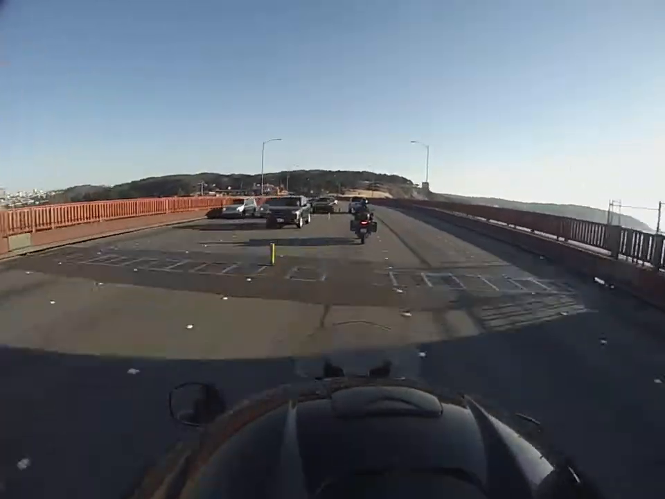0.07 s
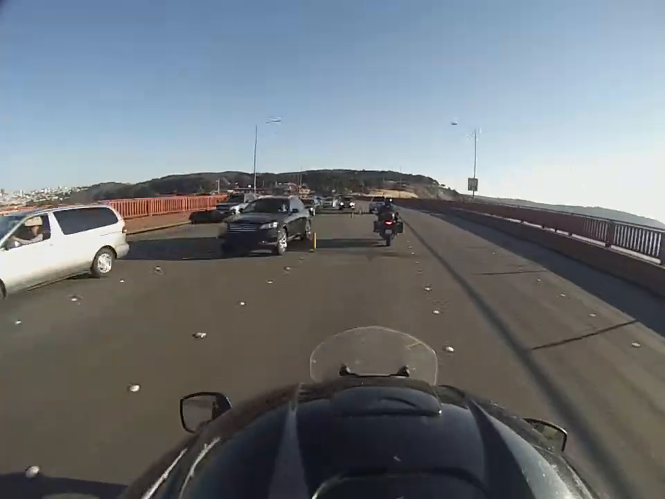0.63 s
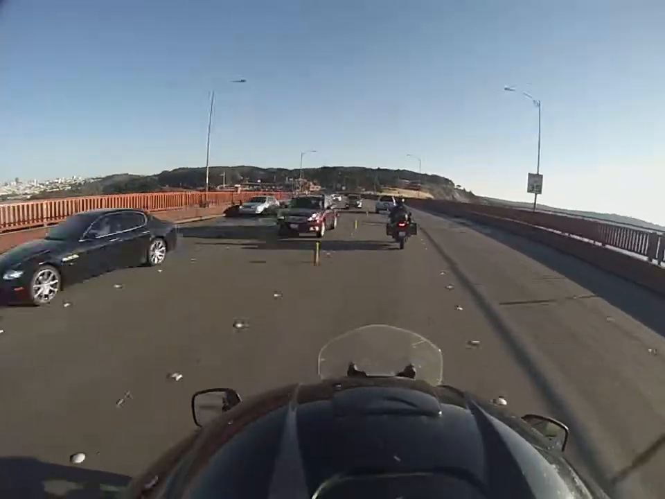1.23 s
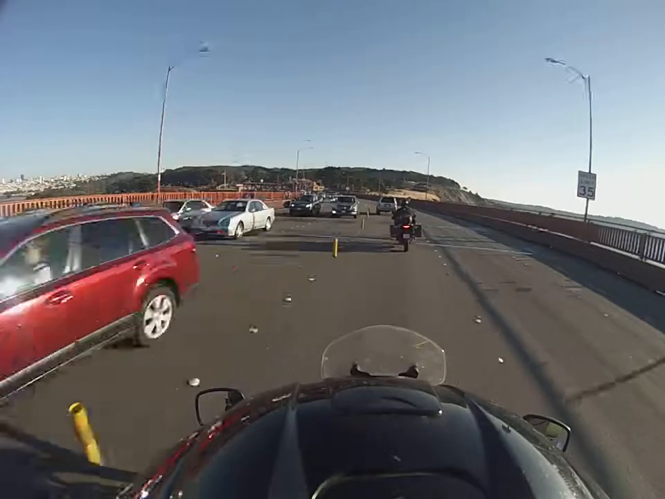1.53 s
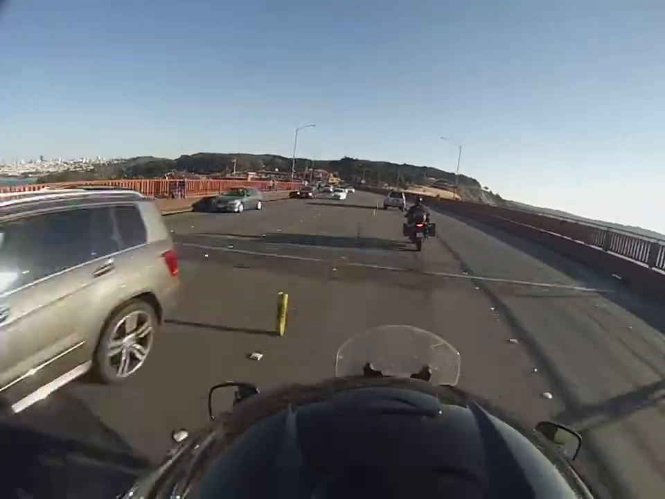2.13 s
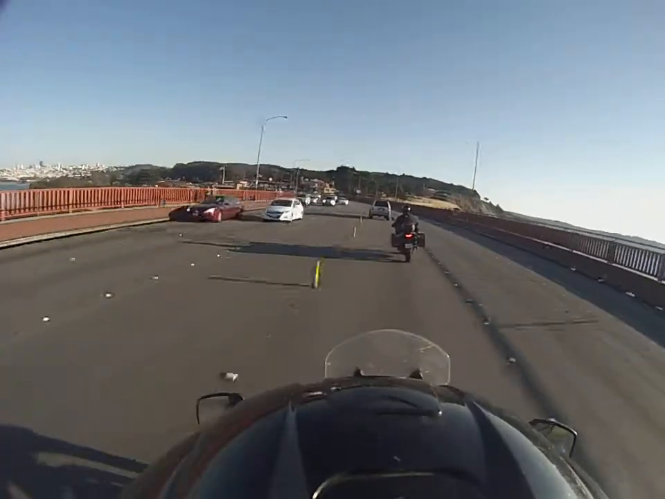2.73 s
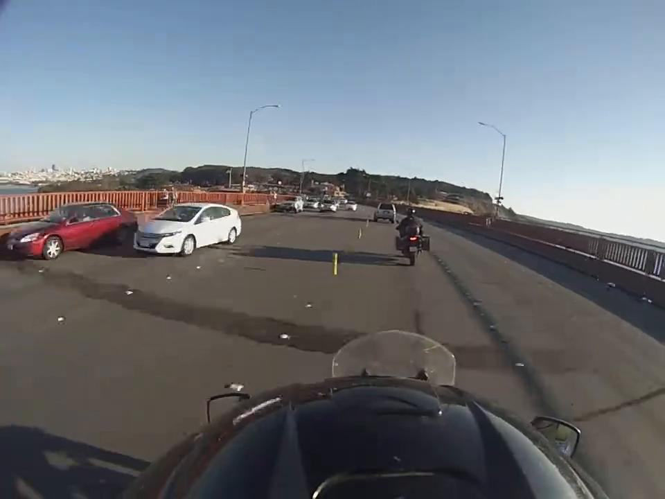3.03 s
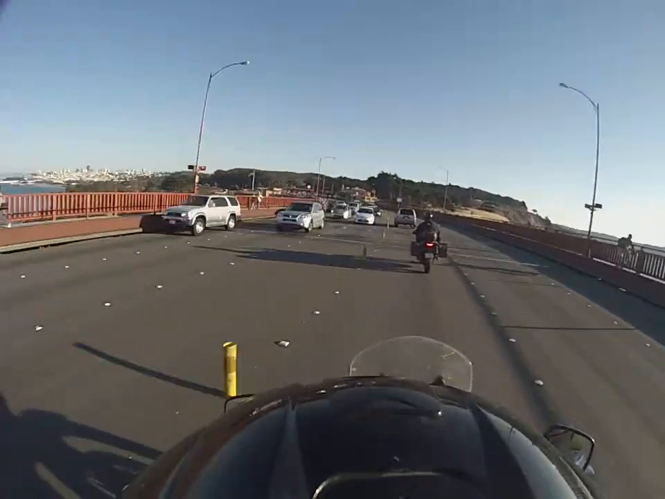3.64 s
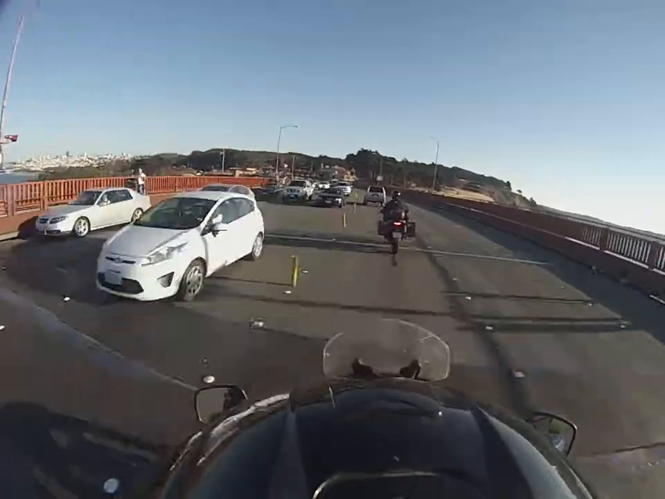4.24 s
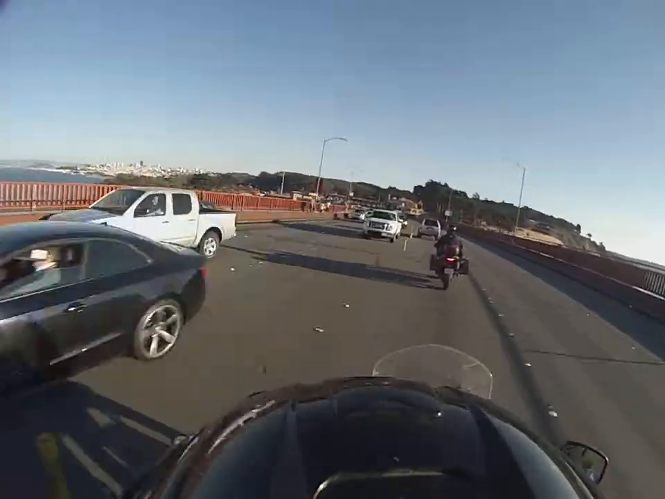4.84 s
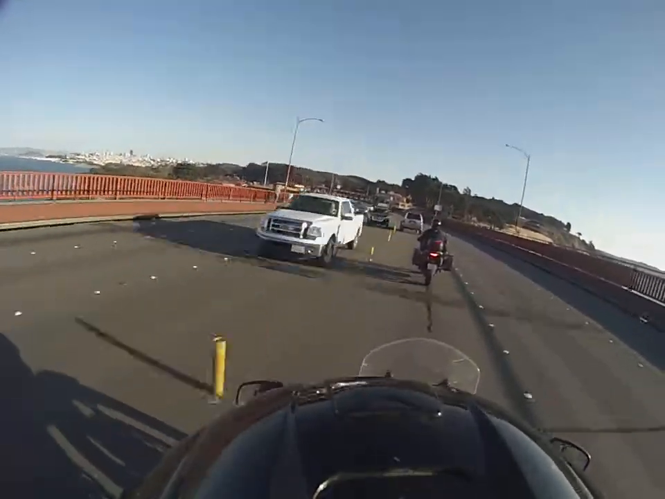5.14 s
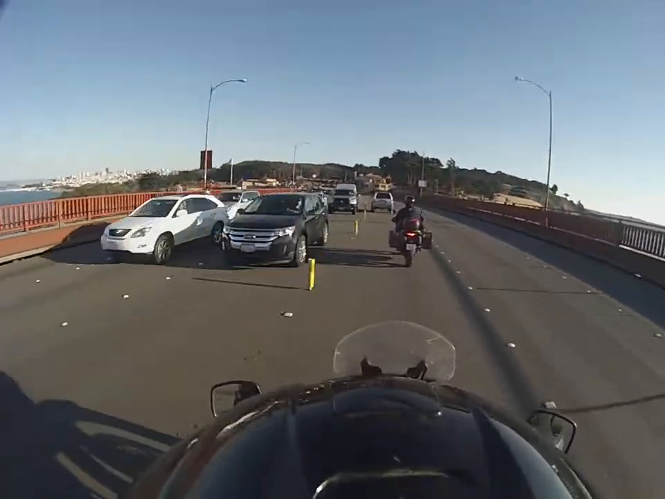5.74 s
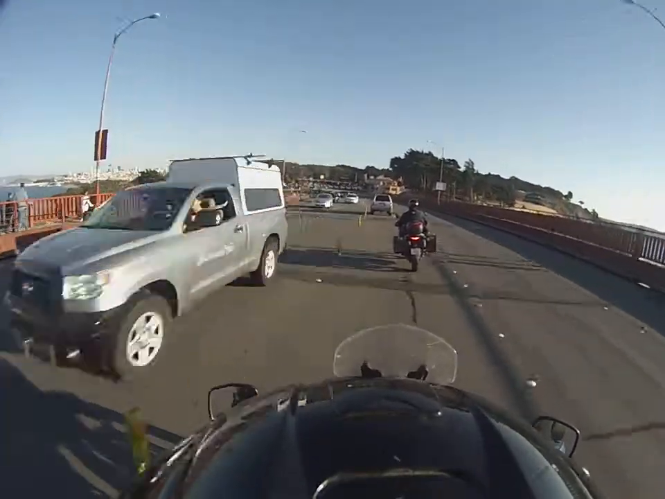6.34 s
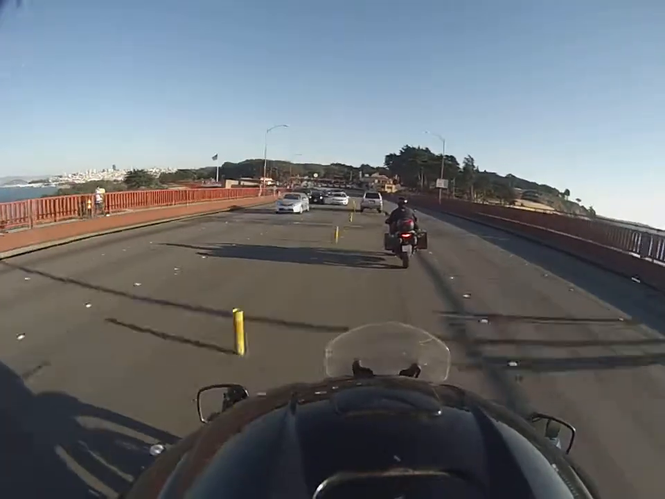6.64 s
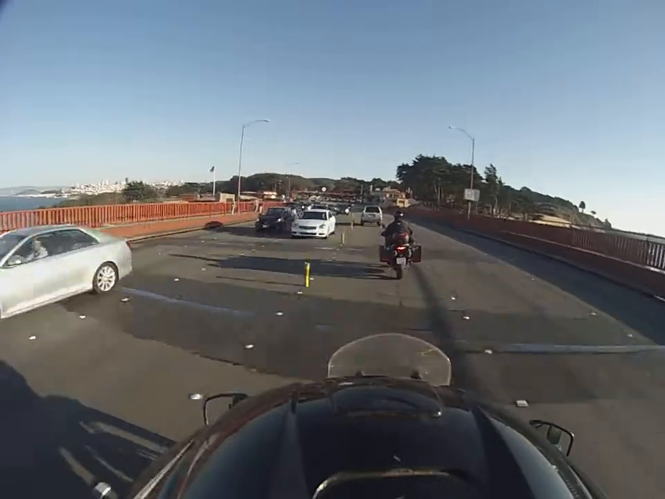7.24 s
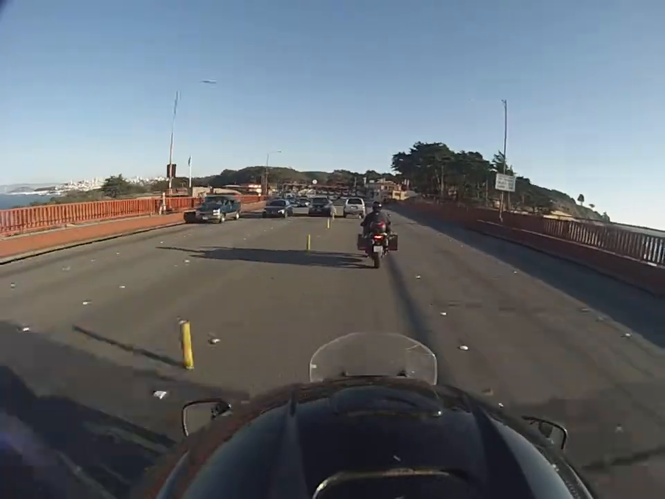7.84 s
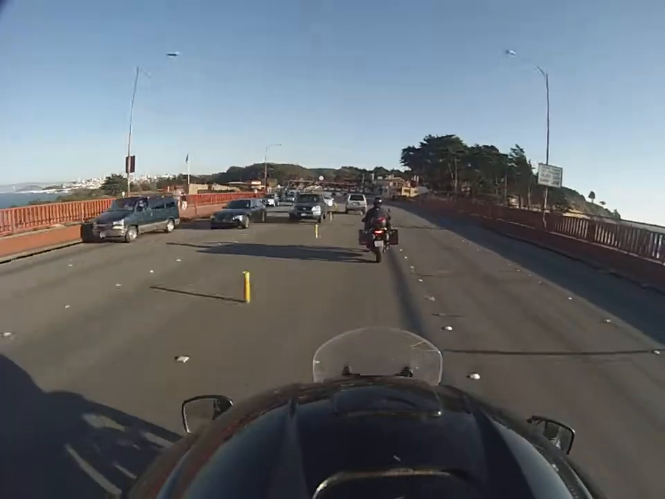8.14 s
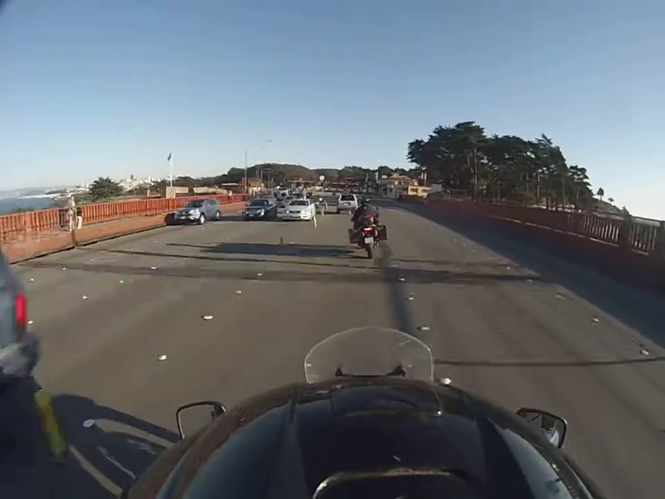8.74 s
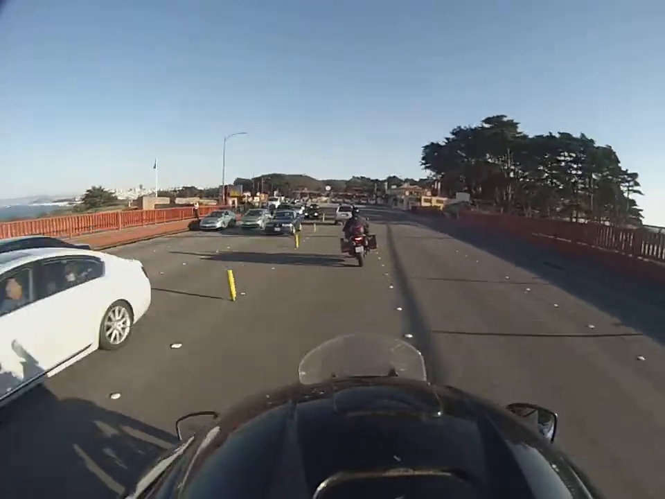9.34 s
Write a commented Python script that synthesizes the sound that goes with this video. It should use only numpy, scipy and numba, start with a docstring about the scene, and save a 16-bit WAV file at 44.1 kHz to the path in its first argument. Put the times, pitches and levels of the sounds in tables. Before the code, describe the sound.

Riding over a bridge on a motorcycle, the microphone takes the wind directly: a low, fluttering rumble with quick, uneven buffets. Oncoming cars pass as brief, soft swishes over thin road hiss. Midway the air and tyre noise rises to a broad roar and holds for a few seconds before easing. Strong buffets thump and crackle slightly, each making the rush dip and swell back.

```python
"""Wind rumbles on a microphone riding in the slipstream of a motorcycle that cruises over a bridge.
Right at the housing, eddies buffet the shell while air and tyre noise rush through its resonances;
oncoming cars swish past. The hardest buffets thump, and crackle as the limiter clamps down;
after each one the rush is ducked and swells back."""
import sys
import numpy as np
from scipy import signal
from scipy.fft import rfft, irfft
from scipy.io import wavfile
from scipy.ndimage import uniform_filter1d
from numba import njit

SR = 44100
rng = np.random.default_rng(int(sys.argv[2]) if len(sys.argv) > 2 else 0)


def wav_record(signal):
    """Record a signal, one row per channel, as 16-bit PCM in the file named by sys.argv[1]."""
    frames = np.transpose(np.atleast_2d(signal))
    bounded = np.clip(frames, -1, 1)
    # unit amplitude maps onto the largest positive 16-bit level
    quanta = np.round(bounded * 32767).astype(np.int16)
    wavfile.write(sys.argv[1], SR, quanta)


N = 413658
T = np.arange(N) / SR

# Big vortices hitting the housing. Each row: time in seconds, relative pressure in dB,
# size as a rough pitch in Hz, crackle offset in dB.
VORTICES = [(.353, 5, 114, -32), (.367, 7, 90, -36), (.424, 9, 84, -34), (.549, 2.5, 80, -40),
            (.637, 7.5, 113, -35), (.677, 4, 230, -36), (0.789, -0.5, 81.5, -32), (0.833, 3.5, 119, -37),
            (.944, 6, 125, -33), (1.188, -3, 190, -44), (1.241, 2.5, 98, -43), (1.294, -5, 130, -29.5),
            (1.688, 7.5, 160, -35), (1.773, 1, 123, -30), (1.8, 3, 110, -39), (1.821, 5.5, 88, -46),
            (1.954, 6, 79.6, -34), (2.215, 2, 149, -32.5), (2.266, 3.5, 160, -34.5), (2.391, 2, 100, -37),
            (2.453, 5.5, 122, -33), (2.525, 5, 236, -33), (2.585, 0, 170, -48), (2.608, 6, 190, -39),
            (2.903, 3, 112, -34), (2.961, 6.5, 99, -44), (3.03, 2.5, 95, -34), (3.202, 0, 125, -41),
            (3.251, -5.5, 214, -36), (3.273, 3, 111, -36), (3.349, 5, 91, -34), (3.412, 3.5, 91, -35),
            (3.586, 5.5, 144, -32.5), (3.771, 6, 100, -32), (3.912, 3.5, 139, -35), (4.098, 5.5, 157, -51),
            (4.158, 10, 226, -36.5), (4.217, 8.5, 120, -35.5), (4.273, 0, 190, -42), (4.459, 3, 120, -37),
            (4.519, 5, 137, -51), (4.744, 9, 170, -34), (5.676, 4, 151, -34), (5.992, 3, 130, -31),
            (6.043, 5.5, 144, -45), (6.435, 0.5, 170, -44), (6.462, 3, 112, -29), (6.504, 8.5, 130, -37),
            (6.538, 10, 128, -39), (6.571, 12, 66, -25), (6.727, 9.5, 127, -33), (6.922, -4.5, 163, -36),
            (7.045, 6.5, 94, -34), (7.764, 5.5, 96, -34), (7.853, 4.5, 86, -27), (7.87, 13, 80, -28),
            (7.891, 18.5, 118, -31), (8.027, 12.5, 178, -35.5), (8.059, 11.5, 143, -38),
            (8.473, -3, 120, -33), (8.509, 4, 151, -38), (8.905, 11, 113, -28), (9.06, 10.5, 124, -46),
            (9.143, 4.5, 86, -32), (9.283, 1.5, 92, -35)]


def undb(db):
    """Decibels to gain."""
    return 10 ** (np.asarray(db) / 20)


def unit(x):
    """Scale to rms 1."""
    return x / np.sqrt(np.mean(x ** 2))


def colour(x, points, resonances=()):
    """Filter by a spectrum with resonant bumps; rms 1."""
    f = np.maximum(np.arange(N // 2 + 1) * SR / N, 1)
    hz, db = np.transpose(points)
    shape_db = np.interp(np.log(f), np.log(hz), db)
    for centre, width, lift in resonances:
        shape_db += lift / (1 + (2 * (f - centre) / width) ** 2)
    return unit(irfft(rfft(x) * undb(shape_db), N))


def walk(rate_hz):
    """Random levels held 1 / rate_hz seconds and smoothed twice; rms 1."""
    hold = max(int(SR / rate_hz), 2)
    held = rng.standard_normal(N)[np.arange(N) // hold]
    return unit(uniform_filter1d(uniform_filter1d(held, hold), hold))


def around(s, reach_s=.03):
    """The samples within reach of a moment, and their time from it."""
    near = slice(max(int((s - reach_s) * SR), 0), int((s + reach_s) * SR))
    return near, T[near] - s


def turbulence(level_db, wake_rise_s=.028, wake_fall_s=.051, lull_s=.033):
    """Strength of the rumble: it swells around each vortex and drops as the flow lifts off the housing."""
    # Each row: time in seconds, drop of the rumble in dB (negative for a swell).
    lulls = [(0.136, 7), (.46, -1.5), (.73, 3), (.865, 7), (.99, 4.5), (1.88, 7.5), (2.49, 10), (2.555, 5),
             (2.644, 10), (2.82, -1.5), (2.99, 5.5), (3.3, 7.5), (3.636, 20.5), (3.877, 11.5), (3.972, 8.5),
             (5.22, -7), (6.629, 7), (7.085, 5.5), (7.801, 7), (7.97, 7), (8.954, 7.5)]
    power = undb(level_db) ** 2
    for s, pressure_db, *_ in VORTICES:
        near, t = around(s, reach_s=.2)
        wake = np.exp(np.minimum(t / wake_rise_s, -t / wake_fall_s))
        power[near] += (undb(0.61 * pressure_db - 13.5) * wake) ** 2
    for s, drop_db in lulls:
        near, t = around(s, reach_s=.2)
        power[near] *= undb(-drop_db * np.exp(-(t / lull_s) ** 2)) ** 2
    return np.sqrt(power)


def wind_rumble(strength, churn_db, even_s=.068):
    """Turbulent pressure right on the housing, arriving in quick clumps."""
    # Each row: frequency in Hz, relative level in dB.
    spectrum = [(12, -9.5), (25, 0), (60, 2), (110, -1), (190, -2.5), (280, -6), (380, -15.5), (500, -25),
                (700, -38.5), (1000, -51.5), (2000, -86.5)]
    pressure = colour(rng.standard_normal(N) * undb(churn_db), spectrum)
    slow_swell = np.sqrt(uniform_filter1d(pressure ** 2, int(even_s * SR)) + 1e-9)
    return pressure / slow_swell * strength


def rush(rush_db, roar_db, churn):
    """Air and tyre noise heard through the housing; a lower roar joins in the full slipstream."""
    # Two spectra. Each row: frequency in Hz, relative level in dB.
    rush_spectrum = [(400, 3), (900, 1.5), (1250, -1.5), (1580, 3.5), (1900, -2), (2500, -4.5),
                     (3100, -7.5), (3800, -17.5), (5300, -24), (7500, -24.5), (9500, -31.5), (11500, -31),
                     (13000, -45), (15000, -44.5)]
    roar_spectrum = [(150, -11), (350, 14), (550, 6), (750, 0), (1000, -7.5), (1300, -27), (2000, -19),
                     (4000, -50)]
    # The housing's cavity resonances and one notch. Each row: centre in Hz, width in Hz, lift in dB.
    housing = [(1480, 100, 2), (2170, 66, 2.5), (4590, 500, 4), (4846, 510, 6.5), (6200, 240, 6.5),
               (7940, 500, 0.5), (12700, 500, -6.5), (13400, 700, 11)]
    hiss = colour(rng.standard_normal(N), rush_spectrum, housing)
    hiss *= undb(rush_db + 0.69 * churn + 0.77 * walk(250))
    roar = colour(rng.standard_normal(N), roar_spectrum)
    roar *= undb(roar_db + 5.0 + 1.3 * churn + 1.6 * walk(120))
    return hiss + roar


def eddy(t, hz):
    """Pressure of a passing vortex: a suction core between two soft shoulders."""
    u = (np.pi * hz * t) ** 2
    return (2 * u - 1) * np.exp(-u)


def buffets(rumble, crackle_rise_s=.00044, crackle_fall_s=.00081):
    """Big vortices displace the rumble for a few milliseconds; returns pressure and crackle strength."""
    # Sharp slaps of wind. Each row: time in seconds, then thump, knock and crackle levels in dB.
    slaps = [(1.051, 6.5, -9, -22.5), (5.104, 12, -7.5, -23), (5.438, 6, -11.5, -25)]
    thumps, takeover, crackle = np.zeros((3, N))
    for s, pressure_db, hz, crackle_db in VORTICES:
        near, t = around(s)
        tight_core = undb(-11) * eddy(t, hz=293)
        thumps[near] += undb(pressure_db - 5.5) * (eddy(t, 0.96 * hz) + tight_core)
        takeover[near] += np.exp(-(t * hz) ** 2)
        burst = np.exp(np.minimum(t / crackle_rise_s, -t / crackle_fall_s))
        crackle[near] += undb(pressure_db + crackle_db - 3) * burst
    for s, thump_db, knock_db, crackle_db in slaps:
        near, t = around(s)
        knock = np.cos(2 * np.pi * 880 * t) * np.exp(-(t / 0.00085) ** 2)
        thumps[near] += undb(thump_db) * eddy(t, hz=178) - undb(knock_db) * knock
        takeover[near] += np.exp(-(t / 0.0031) ** 2)
        crackle[near] += undb(crackle_db) * np.exp(-(t / 0.0003) ** 2)
    return rumble * (1 - np.minimum(takeover, 1)) + thumps, crackle


def limiter_crackle(pressure, crackle, onset=0.19, tick_db=-52.5):
    """Hard buffets crackle as the limiter clamps down; lesser crests tick faintly."""
    # Noise bursts stand for the gain steps. Each row: frequency in Hz, relative level in dB.
    spectrum = [(400, -4), (1200, 8), (3000, 6), (5500, -1.5), (8000, -8), (11000, -14), (15000, -33.5)]
    crests = np.clip((np.abs(pressure) - onset) / onset, 0, 3)
    return colour(rng.standard_normal(N), spectrum) * np.hypot(crackle, undb(tick_db) * crests)


def oncoming_cars(half_length_s=.039):
    """Lift of the rush in dB as each car swishes past the microphone."""
    # Each row: time in seconds, lift in dB.
    passes = [(.6, 0), (1.642, 8.5), (2.14, -0.5), (2.38, 4), (3.51, 4), (3.72, 5), (4.04, 4.5), (4.39, 2)]
    return sum(lift_db * np.exp(-((T - s) / half_length_s) ** 2) for s, lift_db in passes)


@njit
def peak_follower(x, attack, release, rest):
    """The limiter's detector jumps up with each peak and sinks back to its rest level."""
    out, level = np.empty(len(x)), rest
    for i in range(len(x)):
        level += attack * max(abs(x[i]) - level, 0.)
        level = max(level * release, rest)
        out[i] = level
    return out


def scene():
    """One churning airflow at the microphone drives rumble and rush; the roar surges with turbulence."""
    # The slipstream on the housing. Each row: time in seconds, base levels of rumble, rush, roar in dB.
    slipstream = [(0, -11.5, -56, -41), (.1, -18.5, -49, -53), (.22, -14.5, -41, -56), (.33, -13, -45, -60),
                  (.5, -15, -48.5, -52.5), (1.3, -16.5, -52.5, -60), (1.62, -15.5, -53.5, -58),
                  (2.3, -17.5, -50.5, -53.5), (3.1, -18.5, -51, -56), (3.7, -14, -51.5, -53.5),
                  (4.5, -17, -48.5, -52), (4.7, -21, -41.5, -36.5), (5, -14, -37.5, -33),
                  (5.7, -18.5, -40.5, -37), (6.2, -18, -41.5, -35.5), (6.9, -13.5, -41.5, -39),
                  (7.2, -19.5, -43, -36.5), (7.7, -17, -40, -37.5), (8.45, -18, -42, -45),
                  (8.75, -20, -46, -45), (9.38, -22.5, -45.5, -54)]
    times, *levels = np.transpose(slipstream)
    rumble_db, rush_db, roar_db = [np.interp(T, times, db) for db in levels]
    churn = walk(rate_hz=55)
    strength = turbulence(rumble_db)
    # Clumps are deep in broken air (weak roar) and shallower in the full slipstream (strong roar).
    depth_db = np.interp(roar_db, [-52.5, -41], [5, 2.5])
    surge_db = 20 * np.log10(strength) - rumble_db
    pressure, crackle = buffets(wind_rumble(strength, depth_db * churn))
    air = rush(rush_db + oncoming_cars(), roar_db + 0.06 * surge_db, churn)
    return (pressure + limiter_crackle(pressure, crackle) + air)[None]


def record(dry, threshold=0.42, attack_s=0.00064, release_s=0.12, ease_s=0.0012, top_hz=13950):
    """A fast limiter ducks after each big peak and recovers slowly; overshoots clip; the top is cut."""
    attack = 1 - np.exp(-1 / (attack_s * SR))
    release = np.exp(-1 / (release_s * SR))
    peak = peak_follower(dry[0], attack, release, threshold)
    gain = uniform_filter1d(threshold / peak, int(ease_s * SR) + 1)
    limited = np.clip(dry * undb(1.5) * gain, -1, 1)
    lowpass = signal.ellip(8, .2, 70, top_hz, fs=SR, output="sos")
    return signal.sosfilt(lowpass, limited)


dry = scene()
out = record(dry)
wav_record(out)
```